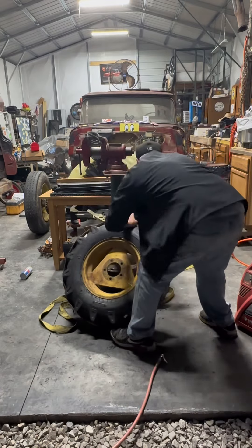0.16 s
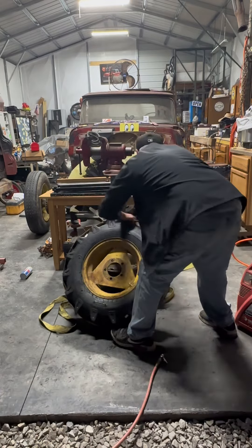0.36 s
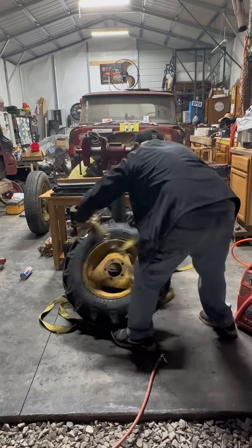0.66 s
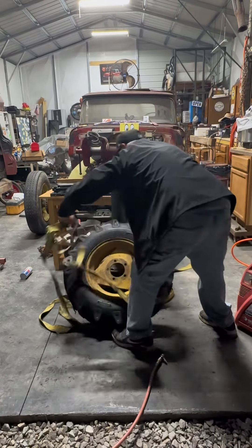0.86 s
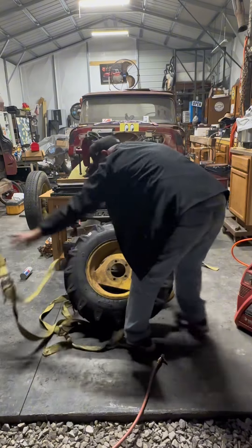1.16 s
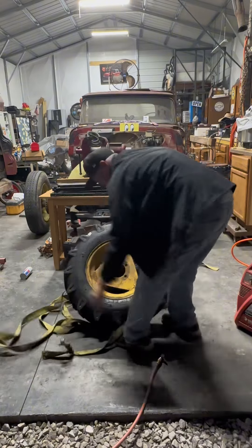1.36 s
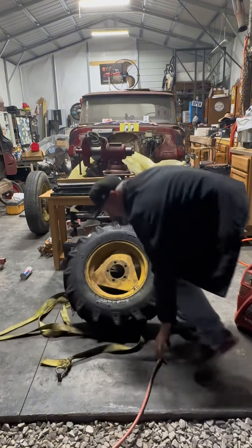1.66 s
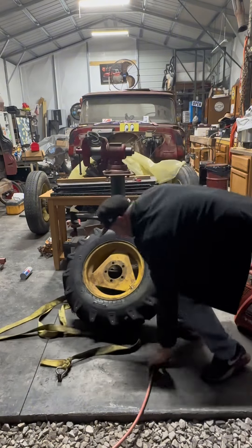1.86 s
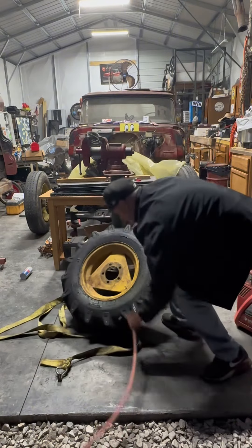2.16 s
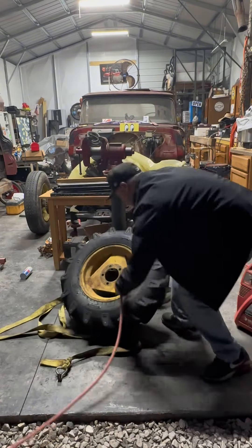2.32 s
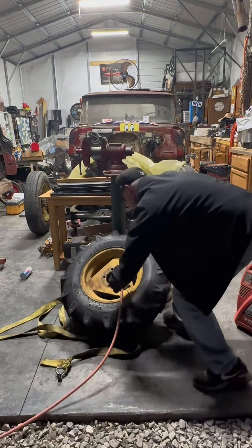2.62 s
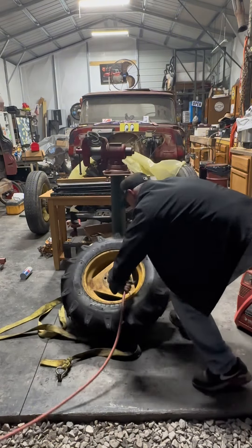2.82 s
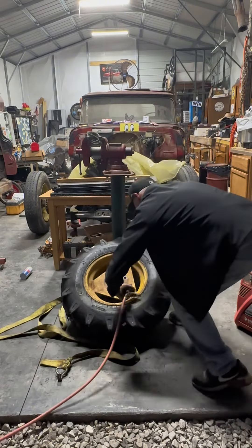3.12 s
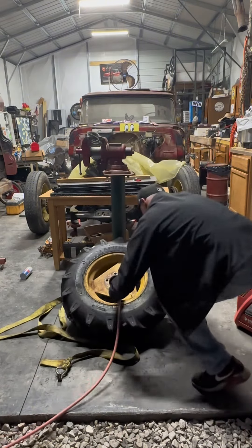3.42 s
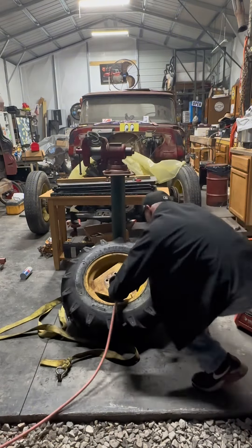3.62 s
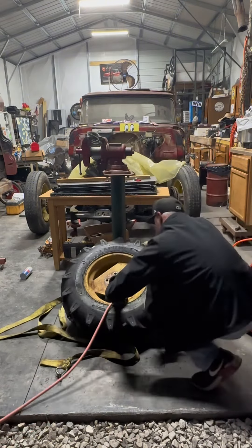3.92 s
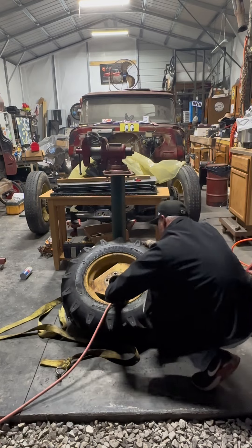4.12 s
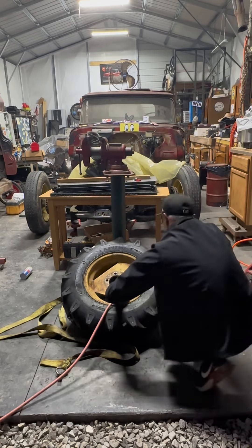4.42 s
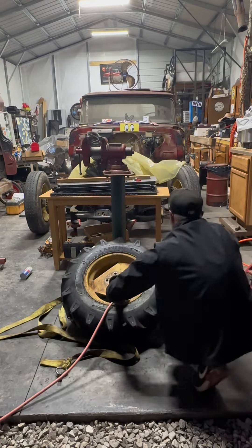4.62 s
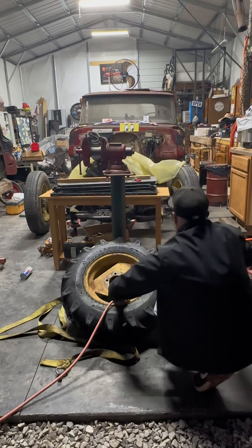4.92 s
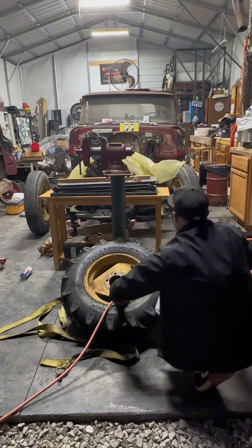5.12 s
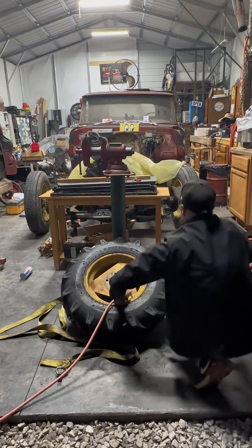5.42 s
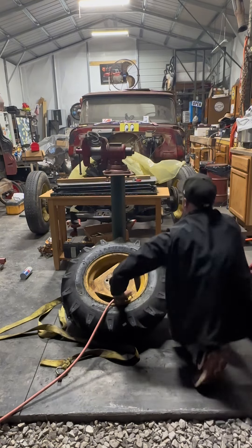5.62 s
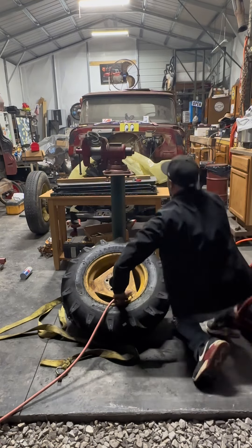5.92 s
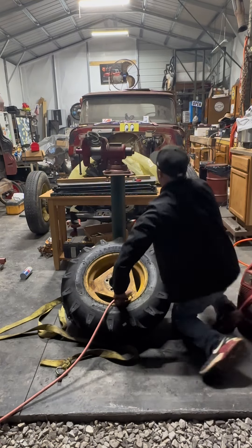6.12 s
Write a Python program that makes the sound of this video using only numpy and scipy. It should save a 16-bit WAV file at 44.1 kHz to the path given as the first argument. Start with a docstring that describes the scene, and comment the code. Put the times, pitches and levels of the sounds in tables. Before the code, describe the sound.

In a humming workshop, an open air hose hisses steadily while a strap is pulled off a tyre, its steel hooks and ratchet clinking on concrete. The chuck spurts, a thud lands, then a loud whistling blast roars past the valve and cuts off abruptly. A thin rush fills the tyre with faint knocks, before a small bright leak bursts out. Phone microphone a few metres away, in stereo.

```python
"""A tractor tyre is inflated in a humming shed, heard by a phone a few metres away. An open hose hisses (coloured noise)
and rubber squeaks (gliding overtones) as a strap comes off: steel clinks (decaying modes), feet and gear knock, scuff
and thud (noise bursts, damped modes). The chuck spurts, then blasts past the valve stem (noise with whistling bands).
It seats: the seal sings and a thin rush fills the tyre. A leak seeps, then bursts out. The hum is wavering tones over
rumble."""
import sys
import numpy as np
from scipy import signal
from scipy.fft import rfft, irfft
from scipy.io import wavfile

SR = 44100
rng = np.random.default_rng(int(sys.argv[2]) if len(sys.argv) > 2 else 0)


def int16_out(signal):
    """Quantize to a 16-bit WAV file."""
    q = np.round(np.clip(np.atleast_2d(signal).T, -1, 1) * 32767)
    wavfile.write(sys.argv[1], SR, q.astype(np.int16))


N = 276507
T = np.arange(N) / SR
FREQS = np.maximum(np.arange(N // 2 + 1) * SR / N, 1)

# Hiss of the open chuck as the hose is handled. Each row: time in seconds, level in dB before JET_GAIN_DB.
HOSE_LEVEL = [(0.0, -27.5), (0.53, -28.5), (0.78, -30.5), (1.27, -29.5), (1.44, -36), (1.72, -32),
              (1.92, -29.5), (2.02, -31), (2.19, -31), (3.4, -34.5)]
# Spectra of the free jet, the blast in the gap, the air striking the rim, the flow into the tyre and the leak.
# Each row: frequency in Hz, relative gain in dB.
JET_SPECTRUM = [(200, -33), (600, -20), (1400, -18.5), (1750, -14.5), (3500, -13), (4400, -10.3),
                (5100, -10.5), (5500, -11.5), (6300, -5.5), (7100, -2.3), (7700, -3), (9000, -2.2),
                (10100, .3), (11500, -2.7), (15500, -2.7)]
BLAST_SPECTRUM = [(400, -38), (1500, -23), (3500, -16), (4400, -11), (5000, -11), (5900, -8.5), (6200, -3),
                  (7200, -1.5), (8700, 0), (10200, -1), (11500, -4.5), (15500, -8.5)]
RIM_SPECTRUM = [(300, -19.5), (700, -8.5), (950, -2), (1500, -1.5), (2100, -3), (2700, -3), (3600, -7),
                (4500, -6.5), (8000, -18.5)]
FILL_SPECTRUM = [(200, -21), (1000, -9), (2000, -7), (2700, -11), (3500, -17), (4500, -12), (5200, -3.5),
                 (5700, -7), (6400, 1), (7000, -4), (8000, -6), (9800, -2), (11000, -3.5), (15500, -7.5)]
LEAK_SPECTRUM = [(1500, -20), (2200, -12.5), (3300, -19), (4600, -15), (6000, -6), (7400, -4.5),
                 (9800, 2.5), (12500, -11), (15500, 3)]
# Spurts as the chuck slips on the stem. Each row: peak time in seconds, half length in seconds,
# hiss in dB, air striking the rim in dB.
SPURT_EVENTS = [(2.9, 0.027, -27.5, -35.5), (2.965, .04, -38, -40), (3.008, 0.028, -25.5, -33),
                (3.245, 0.035, -42, -39.5), (3.468, 0.04, -33, -32), (3.55, .05, -29, -36),
                (3.64, 0.045, -22, -33), (3.728, 0.022, -17.5, -37), (3.812, 0.026, -45, -36),
                (3.893, 0.0065, -26, -50), (3.925, .018, -42, -40), (4.018, .012, -40, -39),
                (4.08, 0.022, -36, -35.5), (4.183, 0.018, -26, -36.5)]
# The seal sings as it closes and when the chuck shifts. Each row: peak time in seconds,
# half length in seconds, level in dB.
SEAL_SONGS = [(4.19, .025, -32.5), (4.24, 0.056, -38.5), (4.755, 0.017, -44), (4.878, 0.081, -44)]
# Modes of the steel parts of strap and hose, by where they are struck.
# Each row: frequency in Hz, relative level in dB, t60 in seconds.
STEEL_MODES = { "hook": [(2544, 0, .13), (2610, -12, .07), (3090, -15, .08), (3200, -18, .12),
               (5840, 0, .11), (6170, 0, .06), (7047, -15, .09), (7850, -17, .15), (9200, -20, .12),
               (9900, -11, .19), (10400, -13, .12)], "hook flat": [(2538, 0, .29), (3100, -17, .3),
               (5812, -12, .3)], "hook edge": [(2546, 0, .36), (2650, -22, .7), (3098, -15, .35),
               (6170, -2.5, .2), (9830, -26, .3)], "second hook": [(2652, -5.5, .5), (2765, -11, .2),
               (3100, -15, .35), (6174, 1, .29), (6230, -9, .25)], "second hook edge": [(2650, -4, .5),
               (2820, -1, .04), (3270, -3, .08), (5835, -9, .4), (6290, -1, .3)],
               "hook tip": [(2543, -6, .5), (2650, -17, .3), (5846, 1, .14), (6207, -1, .14),
               (7246, -6, .07), (8055, -9, .22), (9100, -5, .07), (10540, 6, .13)],
               "ratchet": [(2768, 2, .17), (2776, -16, .65), (3270, -11, .11), (5745, 1, .1),
               (5765, -11, .5), (5850, -4, .12), (6230, -7, .13), (6930, -2, .13), (9588, 0, .13)],
               "ratchet lever": [(2250, -4, .025), (2700, -4, .03), (5050, 2, .07), (5250, -2, .04),
               (6750, 0, .03), (8900, 0, .035)], "ratchet frame": [(1180, -3, .05), (1450, 2, .05),
               (1680, -2, .04), (2650, 1, .035), (4400, -9, .03)], "buckle": [(2782, 7, 0.032),
               (3230, 0.5, 0.044), (5000, -11, 0.085), (5760, 3.5, 0.041), (7750, -13, 0.032),
               (9900, -4, 0.1)], "chuck": [(1250, -2, .014), (1880, 1, 0.016), (2700, -3, .012),
               (3550, 0, .014), (4350, -2, .012)]}
# How each steel part meets the floor. Each entry: tick decay in seconds, swell of the ring in seconds.
FLOOR_CONTACT = {"hook": (0.00093, 0.0017), "hook flat": (.003, 0.021), "hook edge": (.003, 0.03),
                 "second hook": (.003, 0.0046), "second hook edge": (0.0037, .004),
                 "hook tip": (0.0045, 0.0012), "ratchet": (0.0012, 0.0022),
                 "ratchet lever": (0.003, 0.0025), "ratchet frame": (0.0046, 0.0028),
                 "buckle": (0.01, 0.0012), "chuck": (0.0038, 0.0024)}
# Clinks. Each row: start in seconds, part struck, ring gain in dB, contact tick gain in dB.
CLINK_EVENTS = [(.561, "buckle", -35, -20.5), (.672, "ratchet frame", -23, -26),
                (.697, "ratchet frame", -30, -19), (.699, "hook tip", -30, -40),
                (0.7134, "hook tip", -21, -10), (0.734, "hook tip", -29, -22),
                (1.034, "ratchet", -22.5, -7), (1.044, "buckle", -29, -29),
                (1.260, "ratchet lever", -31, -11), (1.273, "ratchet lever", -28, -19),
                (1.349, "hook", -21, -7), (1.359, "hook", -12.5, -23), (1.374, "buckle", -25, -19),
                (1.381, "hook", -21, -28), (1.402, "hook flat", -22, -55), (1.427, "buckle", -35, -20.5),
                (1.448, "hook flat", -20, -50), (1.486, "buckle", -26, -31),
                (1.506, "hook edge", -15.5, -50), (1.592, "second hook edge", -30, -34),
                (1.646, "second hook", -23.5, -42), (1.775, "hook flat", -32, -55),
                (4.311, "chuck", -40, -35), (4.746, "chuck", -45, -40), (5.007, "chuck", -44, -40)]
# Spectrum of the contact tick. Each row: frequency in Hz, relative gain in dB.
TICK_SPECTRUM = [(300, -11), (900, -7.5), (2000, -8.5), (5500, 7.0), (9500, 7.5), (11000, 7.5), (15000, -10)]
# Loose steel fittings chattering on the concrete. Each row: start in seconds, gain in dB,
# centre in Hz, decay in seconds.
RATTLE_EVENTS = [(.67, -26.5, 2600, .009), (.695, -28.5, 3300, 0.0088), (1.266, -31.5, 4200, .04),
                 (1.353, -35, 4500, 0.036), (4.312, -41.5, 3000, .012)]
# Strap, hose and soles knocking on the floor. Each row: start in seconds, gain in dB,
# centre in Hz, decay in seconds.
KNOCK_EVENTS = [(.564, -38.5, 900, 0.042), (.668, -36.5, 750, 0.033), (1.033, -32, 1150, 0.036),
                (1.048, -37, 400, 0.073), (1.262, -40.5, 1540, 0.059), (1.351, -35.5, 1300, 0.064),
                (1.358, -36.5, 400, 0.039), (3.012, -31, 293, 0.028), (4.506, -35.5, 507, 0.026),
                (4.729, -39, 750, 0.013), (4.745, -39.5, 620, 0.026), (5.006, -43.5, 900, 0.025),
                (5.659, -41.5, 880, 0.023)]
# Tyre, strap and shoes dragging briefly. Each row: start in seconds, gain in dB, centre in Hz, decay in seconds.
SCUFF_EVENTS = [(.66, -28, 1360, 0.019), (.688, -32.5, 1490, 0.014), (2.87, -39.5, 630, 0.071),
                (2.94, -41, 198, 0.04), (4.86, -46.5, 1930, 0.029), (5.725, -42, 1930, 0.044)]
# Heavy steps and the strap landing. Each row: start in seconds, gain in dB, pitch in Hz, t60 at that pitch in seconds.
THUD_EVENTS = [(1.265, -34, 112, 0.19), (1.354, -36, 107, 0.14), (3.014, -20, 244.4, 0.1),
               (3.038, -32, 165, 0.21), (4.509, -27, 259, 0.085), (4.516, -34, 113, 0.065),
               (4.741, -28.5, 202, 0.064)]
# The dull ring of a thud. Each row: multiple of its pitch, relative level in dB.
THUD_PARTIALS = [(.72, -1), (1, 1), (1.45, -1.5), (2.1, -4)]
# Rubber rubbing. Each row: start in seconds, length in seconds, start pitch in Hz, end pitch in Hz,
# gain in dB, fall per overtone in dB.
SQUEAK_EVENTS = [(-.03, 0.2, 370, 236, -36.5, 26), (2.044, 0.07, 362, 245, -37.5, 35),
                 (2.292, 0.064, 137.9, 130, -33.5, 5.5)]
# Hum of the shed. Each row: frequency in Hz, mean level in dB.
HUM_TONES = [(87, -49), (119.5, -54), (174, -57.5), (247, -75)]
# Spectrum of the rumble. Each row: frequency in Hz, relative gain in dB.
RUMBLE_SPECTRUM = [(22, -20), (33, -56), (42, -0.5), (65, -1.5), (95, -5.5), (135, -3.5), (200, -7.5),
                   (300, -11.5), (420, -15.5), (700, -22), (1300, -23.5), (2500, -27)]
# Phase between the two microphone ports. Each row: frequency in Hz, lead of the left in radians.
PORT_LEAD = [(100, 0), (750, .3), (1600, 0), (4700, .25), (5400, -.1), (7400, 0), (8200, -1.3),
             (10200, -2.35), (11000, -3.12), (13600, -3.16), (15500, -4.8)]
# Share of sound that differs between the ports. Each row: frequency in Hz, share in dB.
DIFFUSE_SHARE = [(80, -28), (250, -21), (700, -6), (1800, -19), (2500, -5), (2900, -3), (3900, -10),
                 (4700, -5), (5600, -13), (7200, -14), (9000, -9), (11000, -25), (13600, -25), (15500, -9)]

# free jet: gain on the hose level, its fade, and a thin whistle that fades once the hose is disturbed
JET_GAIN_DB, JET_FADE_S = 6.5, (3.5, 3.75)
NOTE_HZ, NOTE_DB, NOTE_FADE_S = 7200, -38.5, (0.46, 1.0)
# the hand closes round the chuck and makes a hollow resonance
CUP_S, CUP_HZ, CUP_DB = (1.73, 2.38), 4190, -41
# the chuck is pressed on, blows past the valve stem, then seats and the blast dies away
PRESS_S, PRESS_RISE_S, SEAT_S, SEAT_FALL_DB_PER_S = 3.415, 0.1, 4.178, 145
# steady blast: hiss in the gap, air striking the rim
GAP_DB, RIM_DB = -24.3, -39.5
# edge tone: climbs and grows as the gap narrows; level relative to the steady hiss
NARROWING_S, EDGE_WIDE_HZ, EDGE_NARROW_HZ, EDGE_DB, EDGE_WIDTH_HZ = (3.6, 3.74), 7600, 8900, -9.5, 600
EDGE_GROWTH = 0.69  # dB that the edge tone gains on the hiss for each dB of extra flow
# lower roar while the gap is wide; level relative to the hiss
ROAR_HZ, ROAR_WIDTH_HZ, ROAR_DB, ROAR_FADE_S = 4890, 1200, -10, (3.63, 3.82)
# the slit round the stem whistles, jumping to a higher note once narrow; level relative to the hiss
STEM_HZ, STEM_JUMP_S, STEM_WIDTH_HZ, STEM_DB = (7260, 8830), 3.8, 110, -12
# the pocket between chuck and rim sinks in pitch; mean level relative to the air on the rim
POCKET_S, POCKET_HZ, POCKET_DB, POCKET_WIDTH_HZ = (3.58, 3.8), (2548, 1785), -5, 410
GURGLE_PER_S, GURGLE_DB, POCKET_WANDER = 20, 3, .06  # rate, spread of level, spread of pitch as a share
SEAL_HZ, SEAL_WIDTH_HZ = 6380, 380
# flow into the tyre once the chuck is seated: mean level and its wander
FILL_DB, FILL_WANDER_DB = -43.5, 2
# the seal seeps more and more, then gives way, and the burst slowly eases
SEEP_S, SEEP_DB = (4.1, 5.5), -42.5
LEAK_S, LEAK_RISE_S, LEAK_DB, LEAK_FALL_DB_PER_S = 5.64, 0.093, -32, 8
# tumbling steel: rate of change, spread of level and of phase
TUMBLE_PER_S, TUMBLE_DB, TUMBLE_RADIANS = 24, 2.3, .5
# pressed against the floor a part rings slightly sharp, then settles
SHARP_SHARE, SETTLE_S = .007, .012
# dull contacts: spread of their noise, attack
RATTLE_OCTAVES, RATTLE_RISE_S = 1, 0.0044
KNOCK_OCTAVES, KNOCK_RISE_S = 1.19, 0.0012
SCUFF_OCTAVES, SCUFF_RISE_S = 0.6, 0.0087
REVERB_T60_S, REVERB_DB = 0.38, -8
TOP_HZ = 15850


def undb(db):
    """Decibels to gain."""
    return 10 ** (np.asarray(db) / 20)


def unit(x):
    """Scale to rms 1."""
    return x / np.sqrt(np.mean(x ** 2))


def curve(rows):
    """Join the points of a time table with straight lines."""
    return np.interp(T, *np.transpose(rows))


def across(points):
    """Spread a frequency table over all frequencies, straight on a log axis."""
    hz, value = np.transpose(points)
    return np.interp(np.log(FREQS), np.log(hz), value)


def noise(gain):
    """Noise of rms 1 shaped by a gain at each frequency."""
    spectrum = rng.standard_normal(2 * len(FREQS)).view(complex)
    return unit(irfft(spectrum * gain, N))


def walk(rate, size=N):
    """Smooth random drift with spread 1; rate sets how often it changes per second."""
    points = rng.standard_normal(4096)
    place = 2 * rate * T[:size] + rng.random()
    k = place.astype(int)
    # a quarter turn of cosine and sine blends neighbours at constant spread
    turn = np.pi / 2 * (place - k)
    return points[k % len(points)] * np.cos(turn) + points[(k + 1) % len(points)] * np.sin(turn)


def ramp(start, end):
    """Rise from 0 to 1 between two times."""
    return np.clip((T - start) / max(end - start, .001), 0, 1)


def turbulence(colour, flutter_db, patchy_db):
    """Rushing air: the whole jet flutters, and each part of its spectrum flickers alone."""
    air, shape = 0, undb(across(colour))
    bands = np.log2(1 + FREQS / 500) * 2
    for k in range(11):
        gain = shape * np.sqrt(np.clip(1 - abs(bands - k), 0, 1))
        flicker = undb(patchy_db * walk(7.3))
        air = air + noise(gain) * np.linalg.norm(gain) * flicker
    return unit(air) * undb(flutter_db * walk(27))


def whistle(hz, width_hz):
    """A breathy resonance: a narrow band of noise riding on a steady or moving pitch."""
    phase = 2 * np.pi * np.cumsum(hz * np.ones(N)) / SR
    band = 1 / (1 + (FREQS / width_hz) ** 2)
    return noise(band) * np.cos(phase) + noise(band) * np.sin(phase)


def open_hose():
    """The chuck's free jet whistles faintly, sounds hollow under the closing hand, and fades on the valve."""
    flow = undb(curve(HOSE_LEVEL) + JET_GAIN_DB) * (1 - ramp(*JET_FADE_S))
    jet = turbulence(JET_SPECTRUM, flutter_db=0.81, patchy_db=1.0) * flow
    note = whistle(NOTE_HZ, width_hz=120) * undb(NOTE_DB) * (1 - ramp(*NOTE_FADE_S))
    cup_swell = undb(CUP_DB) * np.sin(np.pi * ramp(*CUP_S))
    cup = whistle(CUP_HZ * (1 + .03 * walk(3.5)), width_hz=230) * cup_swell
    return jet + note + cup


def escaping(steady_db, column):
    """Strength of the air that misses the valve: a held blast plus the spurts, added in power."""
    fall_db = SEAT_FALL_DB_PER_S * np.maximum(T - SEAT_S, 0)
    held = ramp(PRESS_S, PRESS_S + PRESS_RISE_S) * undb(steady_db - fall_db)
    spurt_power = 0
    for row in SPURT_EVENTS:
        peak, half = row[:2]
        spurt_power = spurt_power + undb(row[column]) ** 2 * np.exp(-((T - peak) / half) ** 2)
    return np.sqrt(held ** 2 + spurt_power)


def gap_blast(through_gap):
    """Air tears through the gap round the stem: hiss, climbing edge tone, early roar and stem whistle."""
    hiss = turbulence(BLAST_SPECTRUM, flutter_db=1.0, patchy_db=1.5)
    narrow = ramp(*NARROWING_S)
    edge_hz = EDGE_WIDE_HZ + (EDGE_NARROW_HZ - EDGE_WIDE_HZ) * narrow
    edge_gain = undb(EDGE_DB) * narrow * (through_gap / undb(GAP_DB)) ** EDGE_GROWTH
    edge = whistle(edge_hz, EDGE_WIDTH_HZ) * edge_gain
    roar_gain = undb(ROAR_DB) * (T > PRESS_S) * (1 - ramp(*ROAR_FADE_S))
    roar = whistle(ROAR_HZ, ROAR_WIDTH_HZ) * roar_gain
    stem_hz = np.where(T < STEM_JUMP_S, *STEM_HZ) * (1 + 0.0062 * walk(8))
    stem = whistle(stem_hz, STEM_WIDTH_HZ) * undb(STEM_DB)
    return (hiss + edge + roar + stem) * through_gap


def gurgle(flow):
    """The pocket between chuck and rim resonates in lumps, lower as the chuck goes home."""
    hz = np.interp(T, POCKET_S, POCKET_HZ) * (1 + POCKET_WANDER * walk(GURGLE_PER_S))
    lumps = undb(POCKET_DB + GURGLE_DB * walk(GURGLE_PER_S))
    return whistle(hz, POCKET_WIDTH_HZ) * lumps * flow * (T > PRESS_S)


def seal():
    """The seal sings breathily whenever air squeezes through it."""
    swell = sum(undb(db) * np.exp(-((T - peak) / half) ** 2) for peak, half, db in SEAL_SONGS)
    return whistle(SEAL_HZ * (1 + .012 * walk(9)), SEAL_WIDTH_HZ) * swell


def tyre_fill():
    """Once the chuck is seated, a thin rush of turbulent air runs into the tyre."""
    level = undb(FILL_DB + FILL_WANDER_DB * walk(2.537)) * ramp(SEAT_S, SEAT_S + 0.058)
    return turbulence(FILL_SPECTRUM, flutter_db=1.0, patchy_db=1.0) * level


def valve():
    """Air blows past the half-seated chuck and strikes the rim in puffs, then runs into the tyre."""
    through_gap = escaping(GAP_DB, column=2)
    onto_rim = escaping(RIM_DB, column=3)
    rim = turbulence(RIM_SPECTRUM, flutter_db=1.8, patchy_db=2.2) * onto_rim
    return gap_blast(through_gap) + rim + gurgle(onto_rim) + seal() + tyre_fill()


def leak():
    """The chuck tilts and a thin, bright hiss escapes round its seal."""
    seep = undb(SEEP_DB) * ramp(*SEEP_S)
    fall_db = LEAK_FALL_DB_PER_S * np.maximum(T - LEAK_S, 0)
    burst = ramp(LEAK_S, LEAK_S + LEAK_RISE_S) * undb(LEAK_DB - fall_db)
    return turbulence(LEAK_SPECTRUM, flutter_db=1.5, patchy_db=1.0) * np.hypot(seep, burst)


def clinks():
    """Each contact ticks and sets a steel part ringing; every mode wavers on its own as the part tumbles."""
    out = np.zeros(N)
    tick = noise(undb(across(TICK_SPECTRUM)))
    age = T[:SR // 2]
    # this clock runs fast at first, so the ring starts sharp
    clock = age + SHARP_SHARE * SETTLE_S * (1 - np.exp(-age / SETTLE_S))
    for start, part, ring_db, tick_db in CLINK_EVENTS:
        tick_s, swell_s = FLOOR_CONTACT[part]
        first = int(start * SR)
        live = slice(first, first + SR // 2)
        ring = 0
        for hz, db, t60 in STEEL_MODES[part]:
            facing_db = TUMBLE_DB * walk(TUMBLE_PER_S, size=len(age))
            wobble = TUMBLE_RADIANS * walk(TUMBLE_PER_S, size=len(age))
            phase = 2 * np.pi * (hz * clock + rng.random()) + wobble
            ring = ring + undb(db + facing_db - 60 * age / t60) * np.sin(phase)
        out[live] += undb(ring_db) * ring * np.minimum(age / swell_s, 1)
        out[live] += undb(tick_db) * tick[live] * np.exp(-age / tick_s)
    return out


def knocks(rows, octaves, rise_s, grit_db):
    """Damped contacts: a gritty band of noise that builds and dies away."""
    out = np.zeros(N)
    grit = undb(grit_db * walk(310))
    for start, db, hz, decay_s in rows:
        body = noise(np.exp(-.5 * (np.log2(FREQS / hz) / octaves) ** 2))
        decay = np.exp(-np.maximum(T - start - rise_s, 0) / decay_s)
        out += undb(db) * body * ramp(start, start + rise_s) * decay
    return out * grit


def thuds():
    """A heavy landing excites a few strongly damped modes; the higher ones die first."""
    out = np.zeros(N)
    for start, db, hz, t60 in THUD_EVENTS:
        age = np.maximum(T - start, 0)
        ring = 0
        for ratio, mode_db in THUD_PARTIALS:
            fade = undb(mode_db - 60 * age * ratio / t60)
            ring = ring + fade * np.sin(2 * np.pi * hz * ratio * age)
        out += undb(db) * ring * ramp(start, start + 0.0078)
    return out


def squeaks():
    """Rubber sticks and slips; the pitch sinks as the sliding slows."""
    out = np.zeros(N)
    waver, grip = 1 + .02 * walk(60), undb(1.8 * walk(50))
    for start, length, from_hz, to_hz, db, fall_db in SQUEAK_EVENTS:
        along = ramp(start, start + length)
        hz = (from_hz + (to_hz - from_hz) * along) * waver
        phase = 2 * np.pi * np.cumsum(hz) / SR
        tone = sum(undb(-fall_db * k) * np.sin((k + 1) * phase) for k in range(5))
        out += undb(db) * tone * np.sin(np.pi * along) * grip
    return out


def reverberate(x):
    """The cluttered shed returns a short, scattered tail of decaying noise."""
    tail = rng.standard_normal(N) * undb(-60 * T / REVERB_T60_S) * ramp(0.0016, 0.021)
    return signal.fftconvolve(x, tail[:SR] / np.linalg.norm(tail))[:N]


def shed():
    """A machine drones somewhere in the building: wavering tones over a low rumble."""
    hum = 0
    for hz, db in HUM_TONES:
        level = undb(db + 2 * walk(7.2)) * np.sqrt(2)
        hum = hum + level * np.sin(2 * np.pi * hz * T + .5 * walk(5.4))
    rumble = undb(-45) * noise(undb(across(RUMBLE_SPECTRUM)))
    return hum + rumble


def scene():
    """All sources in the shed, picked up by two ports whose phases part in the treble."""
    steel = clinks()
    rattles = knocks(RATTLE_EVENTS, RATTLE_OCTAVES, RATTLE_RISE_S, grit_db=4)
    floor_knocks = knocks(KNOCK_EVENTS, KNOCK_OCTAVES, KNOCK_RISE_S, grit_db=3.0)
    scuffs = knocks(SCUFF_EVENTS, SCUFF_OCTAVES, SCUFF_RISE_S, grit_db=3.0)
    contacts = steel + rattles + floor_knocks + scuffs + thuds() + squeaks()
    air = open_hose() + valve() + leak()
    sound = air + contacts + undb(REVERB_DB) * reverberate(contacts) + shed()
    # scattered sound from walls and benches reaches the two ports unequally
    share = undb(across(DIFFUSE_SHARE))
    # the steel falls off to one side: its ring arrives out of step, by more or less as it tumbles
    askew = np.real(signal.hilbert(steel) * np.exp(1j * (1.33 + 0.61 * walk(12))))
    side = rfft(reverberate(sound) + undb(2) * askew)
    sign = np.array([[1], [-1]])  # left, right
    ports = (rfft(sound) + sign * share * side) / np.sqrt(1 + share ** 2)
    return irfft(ports * np.exp(.5j * sign * across(PORT_LEAD)), N)


def record(dry):
    """The phone cuts the top with a steep low-pass."""
    low_pass = signal.ellip(10, .2, 70, TOP_HZ, fs=SR, output="sos")
    return signal.sosfilt(low_pass, dry)


dry = scene()
out = record(dry)
int16_out(out)
```